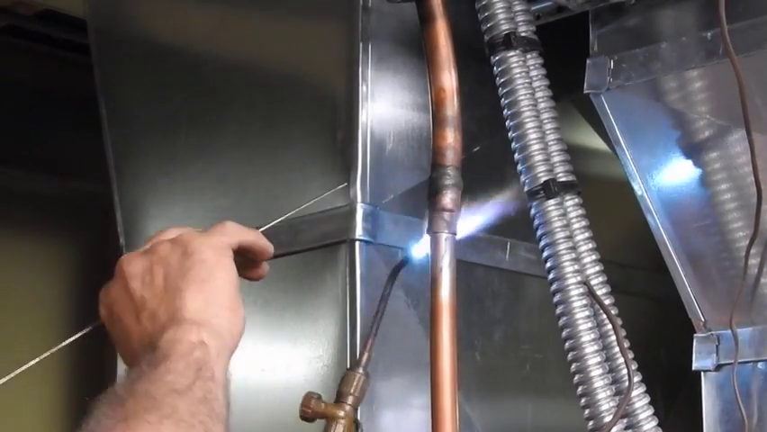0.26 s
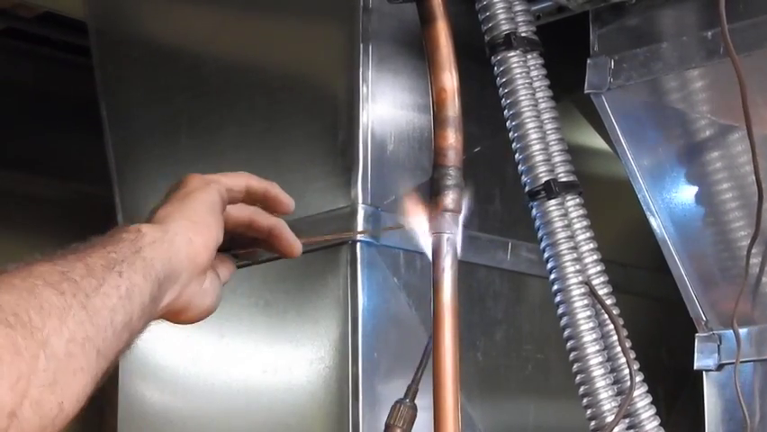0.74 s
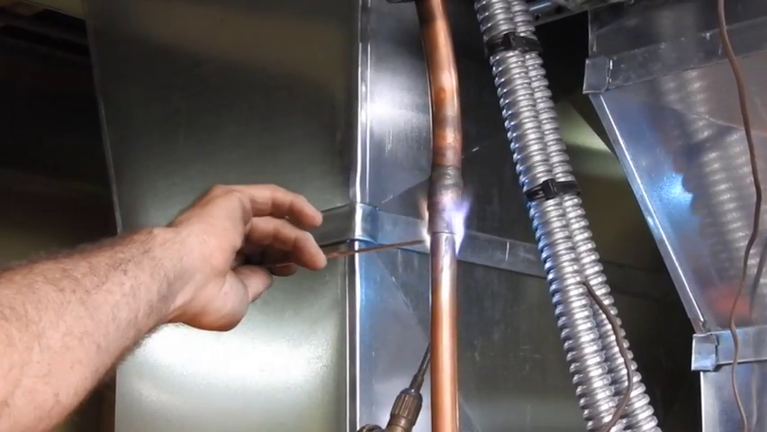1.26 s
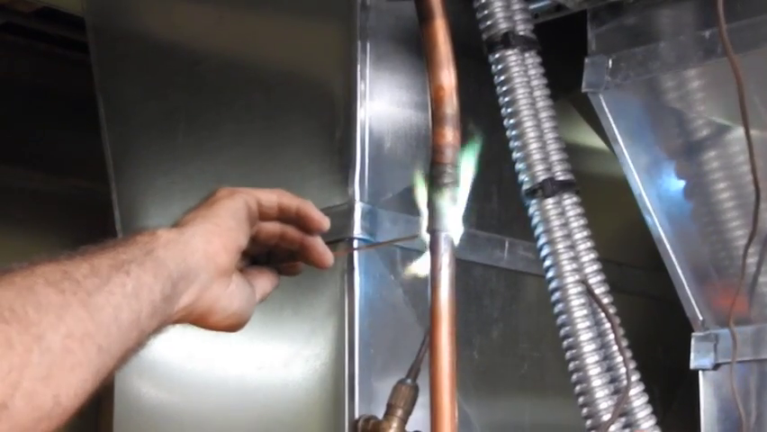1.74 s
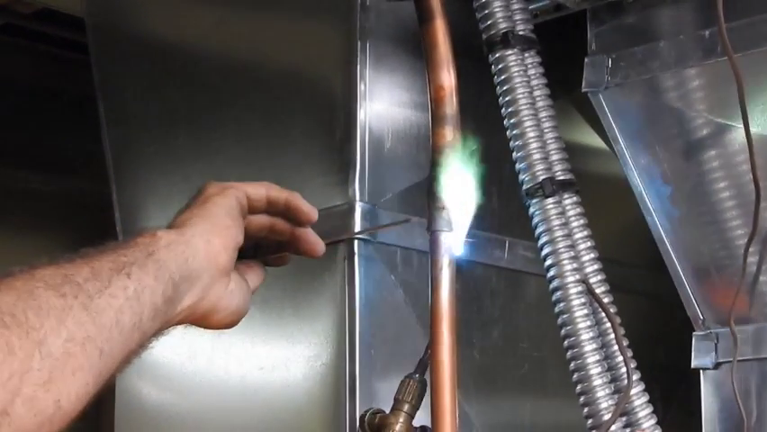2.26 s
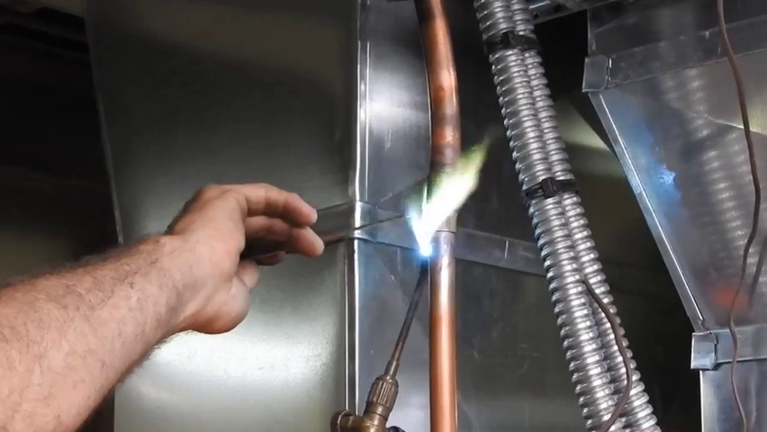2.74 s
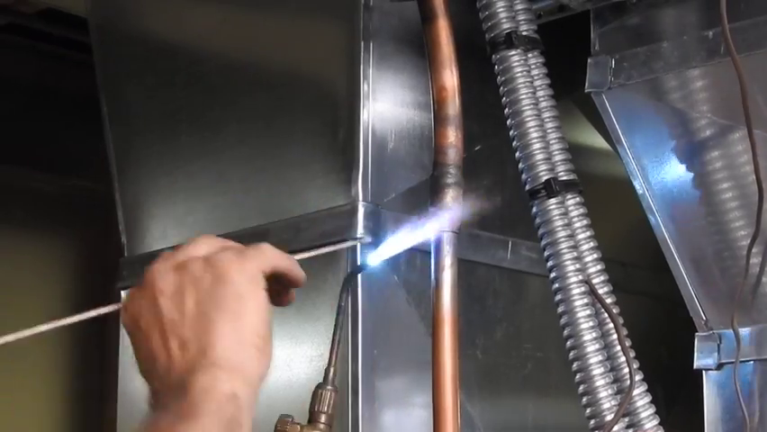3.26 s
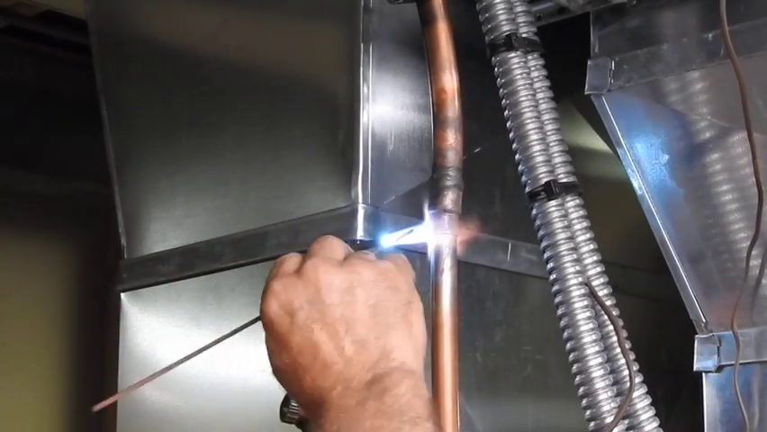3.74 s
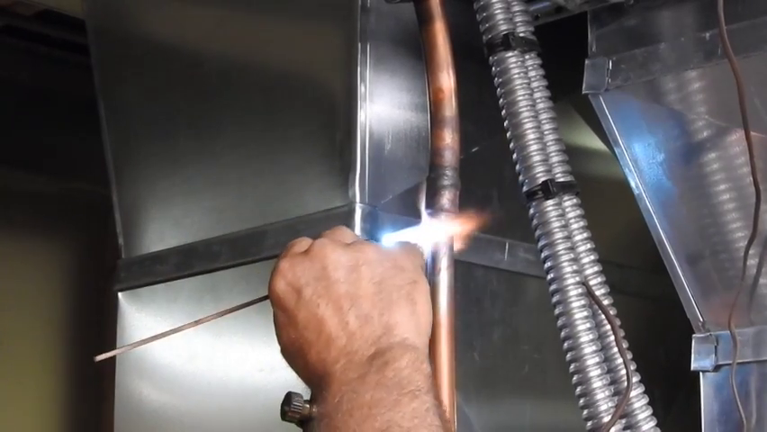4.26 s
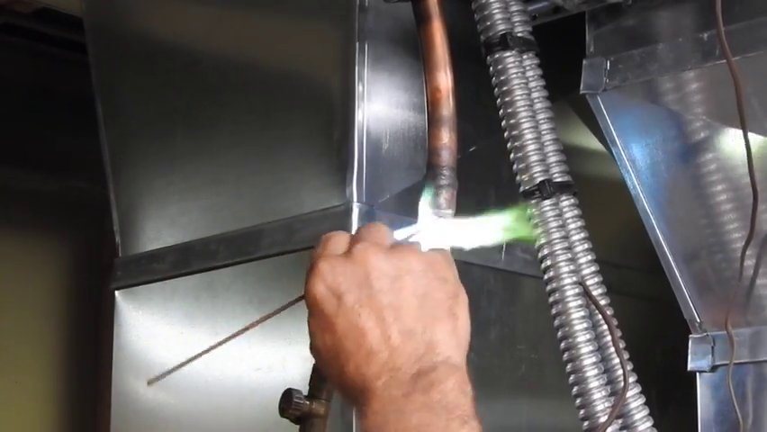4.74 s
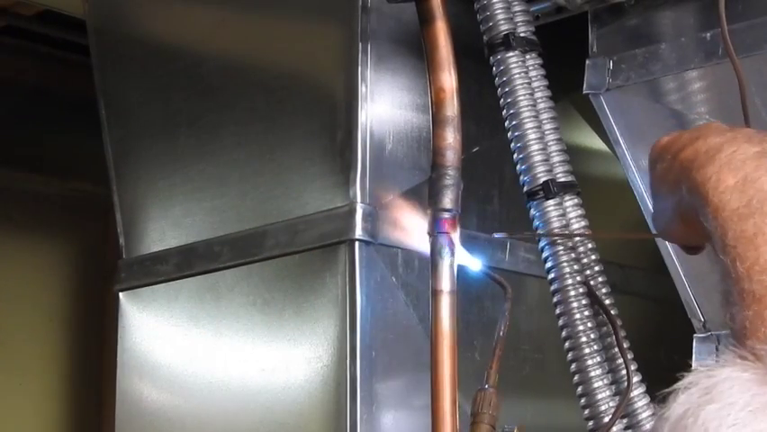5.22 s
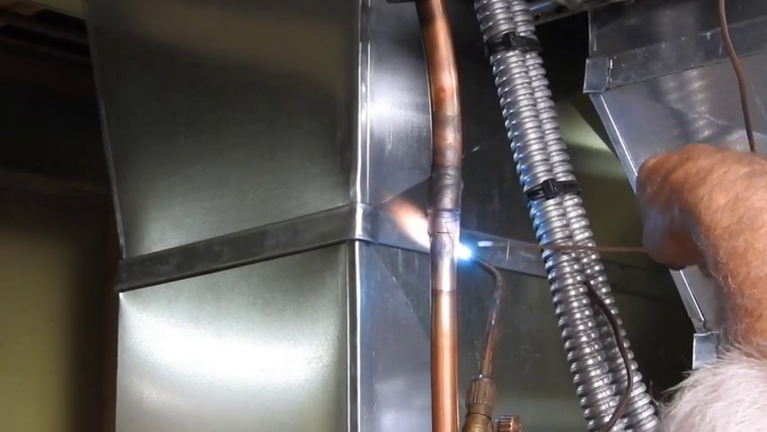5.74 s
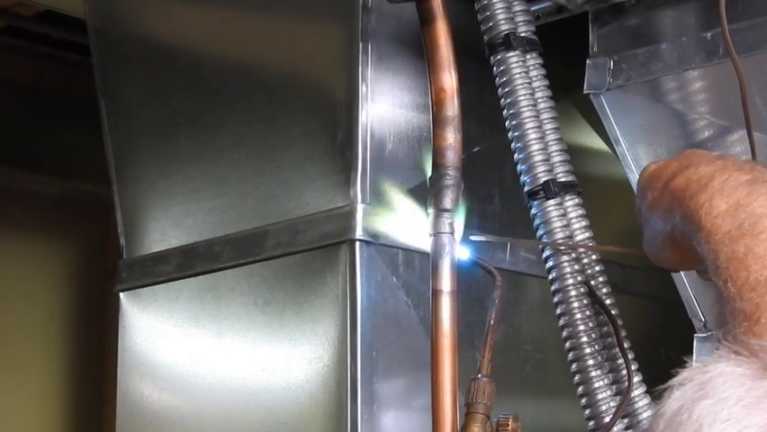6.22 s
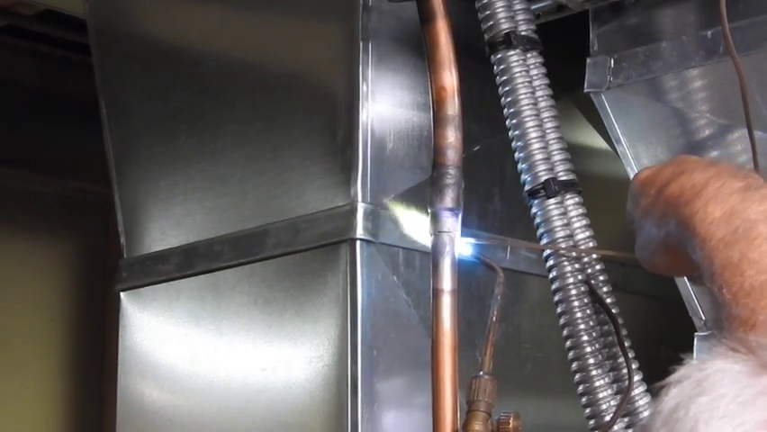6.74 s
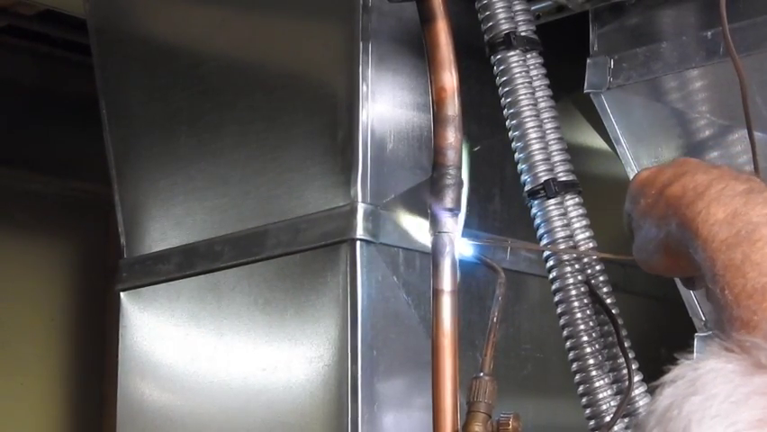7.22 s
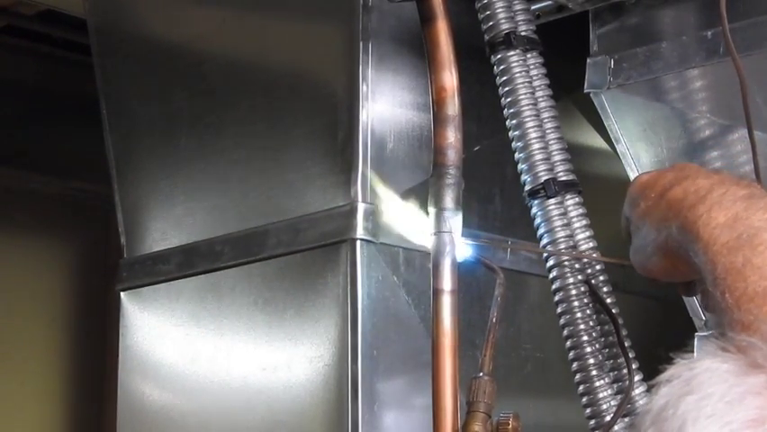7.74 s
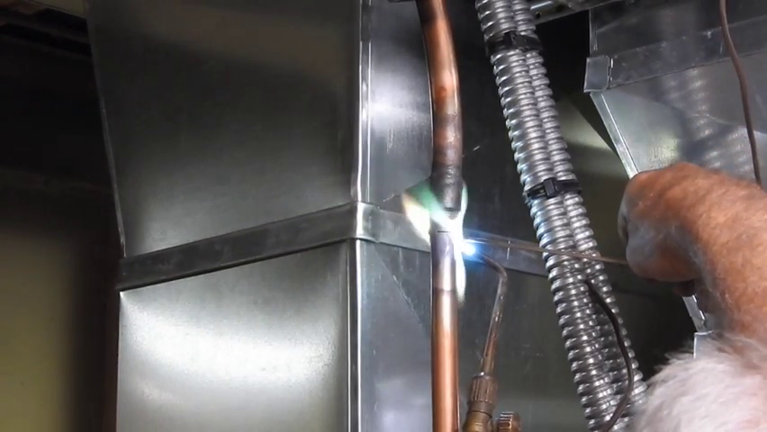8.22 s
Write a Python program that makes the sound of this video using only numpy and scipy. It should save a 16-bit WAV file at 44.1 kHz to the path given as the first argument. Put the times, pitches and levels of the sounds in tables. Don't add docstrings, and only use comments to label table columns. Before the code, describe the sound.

Close, continuous torch jet hiss with a faint fluttering roar, cutting suddenly midway from a high, dulled rush to a stronger, ringing hiss.

```python
import sys
import numpy as np
from scipy import signal
from scipy.io import wavfile
from scipy.ndimage import uniform_filter1d

SR = 44100
rng = np.random.default_rng(int(sys.argv[2]) if len(sys.argv) > 2 else 0)


def pcm_store(signal):
    levels = np.round(np.clip(np.atleast_2d(signal), -1, 1) * 32767)
    wavfile.write(sys.argv[1], SR, levels.astype(np.int16).T)


def boost(x):
    u = np.asarray(x, float) / 20
    return 10 ** u


N = 374409
CUT_S = 4.937


def fast_torch():
    edges = [250, 900, 4500, 10800, 15700]
    calm_db = [-46.5, -42, -36, -27.5]
    # pitch_hz, level_db per Hz
    tone = [(40, -58), (150, -34.5), (300, -23), (600, -10.5), (900, -19), (2000, -24.5), (4500, -21),
            (7400, -26.5), (8000, -29), (8600, -22), (10500, -19), (12500, -13), (15700, -12)]
    # pitch_hz, width_hz, level_db
    rings = [(350, 42, 6.5), (489, 49, 6), (898, 270, -6.5), (1071, 21, 11.5), (1652, 65, 8),
             (2075, 150, 8), (3170, 190, 4), (3690, 300, 5), (4890, 480, -4), (5310, 210, 0),
             (6920, 540, 5.5), (9900, 290, 3.5), (15550, 750, 3.5)]
    # pitch_hz, margin (in spreads of chance)
    solidity = [
        [(2000, 5), (2600, 2.3), (5500, 2.3), (7300, 2.8), (8000, 1.3), (8500, 5)],
        [(100, .5), (300, -.6), (1300, -1.5), (1600, .3), (1900, -.8), (3500, .2), (6000, -.3), (6800, -1.5), (8200, -2.5), (8400, .7), (11500, .6), (12500, 3), (16000, 3)],
    ]
    return torch(calm_db, edges, tone, rings, solidity, speed=1.83, ripple_db=4.0, drift_db=0.95,
                 flicker_db=0.77, puff_db=0.5, apart_db=-2.5, lean_share=0.77)


def slow_torch():
    edges = [120, 450, 2800, 7600, 13000]
    calm_db = [-47, -42.5, -27.5, -20.5]
    # pitch_hz, level_db per Hz
    tone = [(25, -55), (80, -44), (200, -30), (420, -32), (1200, -27), (3000, -25), (4000, -26),
            (4500, -17.5), (7000, -16), (9000, -7.5), (11000, -11.5), (12800, -17), (13300, -23.5),
            (15600, -25)]
    # pitch_hz, width_hz, level_db
    rings = [(279, 165, 11.5), (552, 92, 9), (747, 190, 5.5), (1014, 18, 12.5), (1150, 30, -29),
             (1760, 370, 4.5), (2340, 22, 4.5), (3140, 62, 5.5), (3445, 124, 5), (4030, 320, -3),
             (4896, 590, 4.5), (5250, 200, -8.5), (5600, 100, -2), (6540, 440, 3), (6980, 130, 8.5),
             (7700, 320, 2), (8096, 280, 9.5), (8800, 170, 1), (8300, 150, 2.5), (9390, 350, 5),
             (10230, 370, 4), (11300, 150, 1), (13130, 120, -11)]
    # pitch_hz, margin (in spreads of chance)
    solidity = [
        [(1800, 5), (2200, 2), (3600, 1.8), (3950, .3), (4400, 5), (11000, 3.5), (12800, 1.8), (13200, .2), (14100, -.6), (14600, -1.8), (15600, -3)],
        [(100, .5), (300, -.6), (900, -.3), (2000, .5), (3000, 0), (3600, -1.4), (5000, -2.5), (5500, .3), (7000, 3), (13000, 3), (13600, -.2), (14300, -1.5), (15500, -3)],
    ]
    return torch(calm_db, edges, tone, rings, solidity, speed=1.0, ripple_db=4.0, drift_db=0.8,
                 flicker_db=0.23, puff_db=0.0, apart_db=0.5, lean_share=0.99)


def torch(calm_db, edges, tone, rings, solidity, speed, ripple_db, drift_db, flicker_db, puff_db,
          apart_db, lean_share):
    # start_s, end_s, pitch_hz, width_hz, level_db
    holds = [(0, 0.78, 320, 160, 6), (-0.9, .4, 1000, 480, 3.5), (-.5, 0.37, 5100, 2000, -4.5),
             (-1.5, 1.9, 2190, 130, 5.5), (.5, 2.8, 11500, 390, 6), (1, 2.0, 3330, 1700, -4.5),
             (2, 2.5, 12800, 1500, 3), (2.55, 3.0, 15400, 600, 5.5), (3.5, 4.95, 8100, 510, 4),
             (3, 3.0, 6100, 500, 3), (2.98, 4.1, 5260, 760, -5), (3, 3.6, 1560, 220, 2.5),
             (4.5, 4.95, 3000, 830, 1.5), (3, 4.1, 10250, 330, 4.5), (4, 4.1, 13300, 1700, 4),
             (1.5, 4.95, 12000, 250, -7), (4.1, 4.95, 13500, 800, 2), (3.5, 4.95, 2300, 620, -2.5),
             (5, 5.4, 14300, 1800, 4), (4.9, 6.2, 4750, 460, -2), (5.75, 6.45, 12100, 800, 4),
             (5.75, 6.45, 10400, 450, 5), (6.5, 7.4, 9450, 280, 4), (-.5, 1.2, 7600, 370, 3.5)]
    hop, top_hz = 256, 15780
    hz, t, noise = signal.stft(rng.standard_normal((2, N)), SR, nperseg=8 * hop, noverlap=7 * hop)

    colour = read(tone, hz)
    for pitch, width, level in rings:
        colour = colour + level * bell(hz, pitch, width)
    db = colour[:, None] + np.zeros(len(t))
    for start, end, pitch, width, level in holds:
        held = np.clip(np.minimum(t - start, end - t) / 0.037 + 0.5, 0, 1)
        db += level * np.outer(bell(hz, pitch, width), held)

    part = np.clip(np.digitize(hz, edges) - 1, 0, len(edges) - 2)
    border = np.searchsorted(hz, edges)
    power = [boost(2 * db[lo:hi]).sum(0) / len(hz) for lo, hi in zip(border[:-1], border[1:])]
    gain_db = flame_levels(t, calm_db, speed) - 10 * np.log10(power)
    db += uniform_filter1d(gain_db[part], size=9, axis=0)

    frames = SR / hop / speed
    ripple = ripple_db * np.clip(hz / 2500, 0.3, 1)[:, None]
    db += ripple * patches(db.shape, 1.4, 1.7 * frames)
    db += drift_db * patches(db.shape, 24, 0.24 * frames)
    db += flicker_db * patches(db.shape, 90, 0.03 * frames)
    puffs = puff_db * patches((1, len(t)), 1, 0.03 * frames)
    db += puffs * (part == 0)[:, None]

    mid, side = two_ports(noise, hz, speed, apart_db, lean_share)
    mid *= holes(solidity[0], hz, t, 2, 1)
    low = (hz < 8200 - 3000 * (2 - speed))[:, None]
    side *= np.where(low, holes(solidity[1], hz, t, 30, 1), holes(solidity[1], hz, t, 3, 2))
    ports = np.array([mid + side, mid - side]) * boost(db) * (hz < top_hz)[:, None]
    return signal.istft(ports, SR, nperseg=8 * hop, noverlap=7 * hop)[1][:, :N]


def flame_levels(t, calm_db, speed):
    # start_s, length_s, roar_db, share reaching the flame body
    gusts = [(0.058, 0.29, 7.5, 0.25), (0.34, 0.31, 4, .4), (.66, 0.17, 2.5, .3), (0.95, 0.16, 3.5, -0.26),
             (2.055, 0.15, -2.5, -0.1), (2.218, 0.24, 3.5, 0.26), (2.528, 0.072, -2.5, 2.5),
             (2.64, .3, 1.5, -1), (2.962, 0.64, 4, .3), (3.62, 0.37, 3, 0.27), (4.37, 0.15, 1.5, 0.7),
             (4.857, 0.085, 2.5, 0.55), (4.927, 0.36, 1, 3.5), (5.27, 0.42, 4, 0.9),
             (5.92, 0.54, 3.5, 0.46), (6.46, 0.17, -3.5, .4), (6.7, 0.057, 2, -0.3), (6.916, 0.074, 1.5, 2),
             (7.07, 0.3, -2.5, .5), (7.498, .55, 3.5, .4), (8.08, 0.23, -1, 1.8), (8.3, .3, -6, .4)]
    # time_s, level_db
    aims = [(0.0, -2), (0.45, -1), (1.3, 0), (1.7, -1), (2.3, 1.4), (2.8, .3), (3.0, -0.5), (3.42, -4),
            (3.52, 1.5), (3.98, 1), (4.1, -2), (4.92, -0.5), (4.95, -2), (5.6, -0.8), (6.4, 0), (7.35, 0.1),
            (7.45, -1.3), (8.49, -0.1)]
    # time_s, length_s, level_db
    spits = [(.48, .04, -2), (.68, .04, 0.5), (.74, .04, 0), (1.32, .05, 1), (1.42, .09, -4),
             (2.137, 0.11, -1.5), (2.53, .1, -2), (2.83, 0.052, 0), (3.15, .1, 0), (6.88, .012, 4),
             (7.234, 0.01, 6)]
    rise_s, fall_s = 0.078, 0.15

    start, length, level, share = np.transpose(gusts)[..., None]
    rise = (t - start) / rise_s
    fall = (start + length - t) / fall_s
    gust = level * np.clip(np.minimum(rise, fall) * speed + 0.5, 0, 1)

    middle, length, level = np.transpose(spits)[..., None]
    spit = (level * bell(t, middle, length)).sum(axis=0)
    aim = np.interp(t, *np.transpose(aims)) + spit
    moves = [gust.sum(axis=0), (share * gust).sum(axis=0), 0.35 * aim, aim]
    return np.array(calm_db)[:, None] + moves


def two_ports(noise, hz, speed, apart_db, lean_share):
    # pitch_hz, level_db under the shared sound
    apart = [(30, -19), (150, -48), (800, -13.5), (3000, -36), (4000, 5), (5200, -12), (7000, -8.5),
             (9000, -5), (15000, -7)]
    # pitch_hz, left_minus_right_db
    balance = [(60, -4), (250, 1), (600, -0.5), (1200, -3), (3000, -5), (4500, 0.5), (8000, -3),
               (14000, -0.5)]
    lag_s = 1.1e-5
    tilt = boost(lean_share * read(balance, hz / speed) / 2)
    lean = (tilt * np.exp(-1j * np.pi * hz / speed * lag_s))[:, None]
    own = noise[1] * boost(read(apart, hz / speed) + apart_db)[:, None]
    mid = noise[0] * (lean + 1 / lean) / 2
    side = noise[0] * (lean - 1 / lean) / 2 + own
    return mid, side


def holes(solidity, hz, t, wide, long):
    block_s = t[::4]
    fuller = 1.6 * np.exp(-np.abs(block_s - CUT_S) / 0.35) * (block_s > CUT_S)
    margin = read(solidity, hz[::8])[:, None] + fuller * (hz[::8] > 9000)[:, None]
    stays = margin > patches(margin.shape, wide, long)
    return np.kron(stays, np.ones((8, 4)))[:len(hz), :len(t)]


def bell(x, centre, width):
    return np.exp(-(2 * (x - centre) / width) ** 2 * np.log(2))


def read(table, hz):
    pitch, value = np.transpose(table)
    return np.interp(np.log(hz + 1), np.log(pitch), value)


def patches(shape, wide, long):
    x = rng.standard_normal(shape)
    for axis, span in enumerate((wide, long)):
        for _ in range(2):
            x = uniform_filter1d(x, max(int(span), 1), axis=axis, mode="wrap")
    return x / x.std()


def hum(speed):
    tone = np.sqrt(2) * np.sin(2 * np.pi * 59.2 * speed * np.arange(N) / SR)
    left_right_db = -55.5 + np.array([[-0.75], [0.75]])
    return tone * boost(left_right_db)


def rumble():
    low_pass = signal.butter(2, 60, fs=SR, output="sos")
    low = signal.sosfilt(low_pass, rng.standard_normal(N))
    return low / low.std() * boost(-86)


def scene():
    fade_s = 0.0043
    fast = fast_torch() + hum(2)
    slow = slow_torch() + hum(1)
    after = np.clip((np.arange(N) / SR - CUT_S) / fade_s + 0.5, 0, 1)
    return fast * np.sqrt(1 - after) + slow * np.sqrt(after) + rumble()


def band_limit(x):
    return signal.sosfilt(signal.butter(12, 17110, fs=SR, output="sos"), x)


def record(dry):
    return band_limit(dry)


dry = scene()
out = record(dry)
pcm_store(out)
```